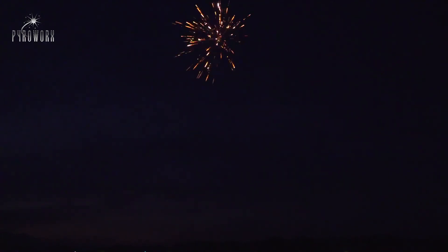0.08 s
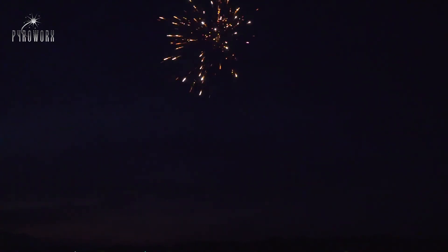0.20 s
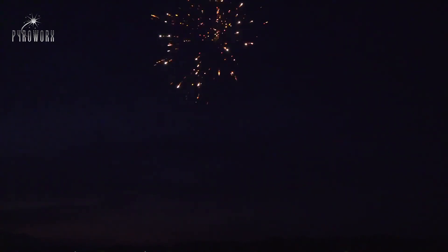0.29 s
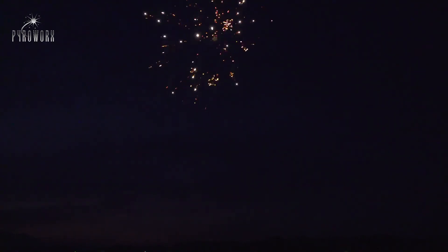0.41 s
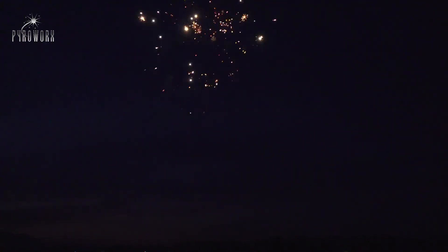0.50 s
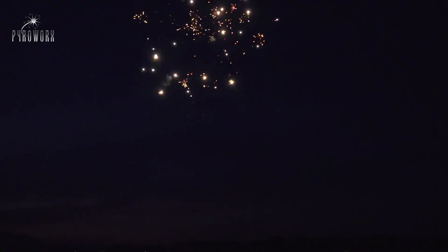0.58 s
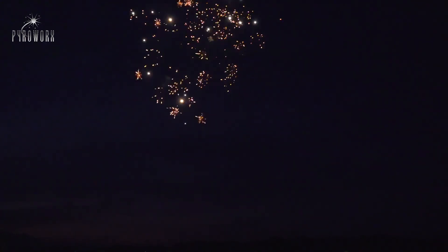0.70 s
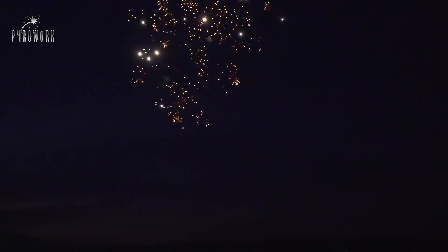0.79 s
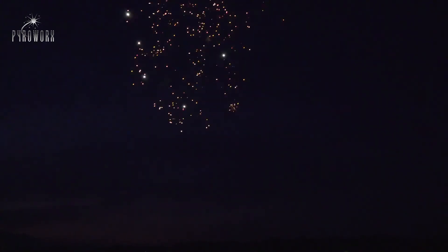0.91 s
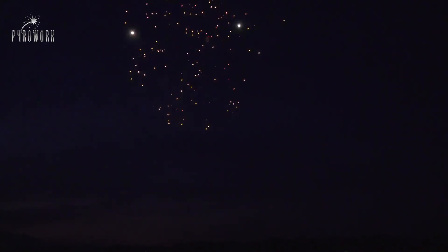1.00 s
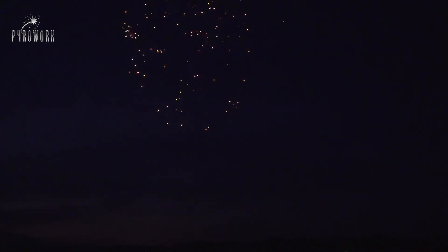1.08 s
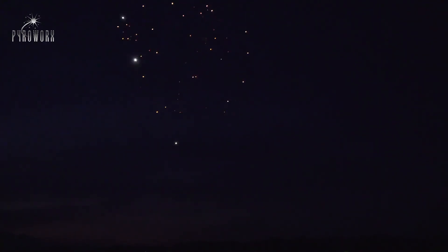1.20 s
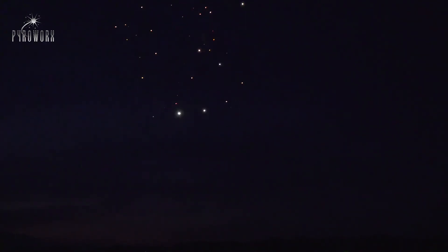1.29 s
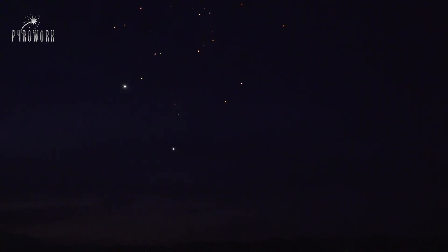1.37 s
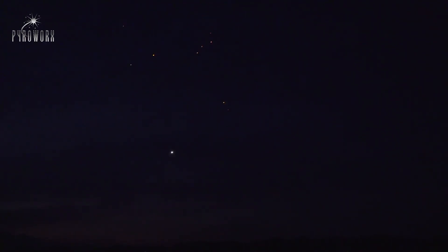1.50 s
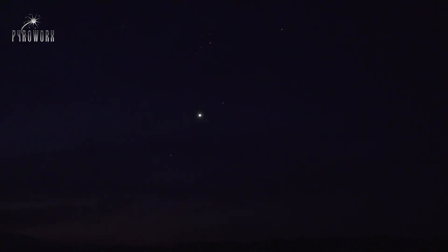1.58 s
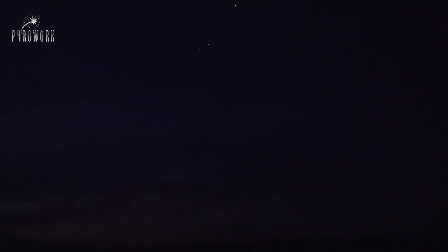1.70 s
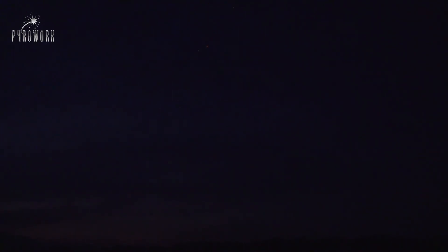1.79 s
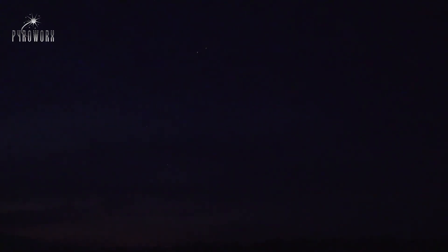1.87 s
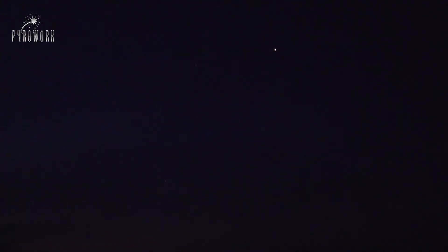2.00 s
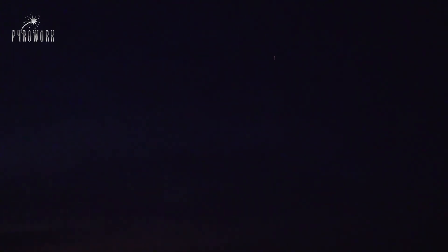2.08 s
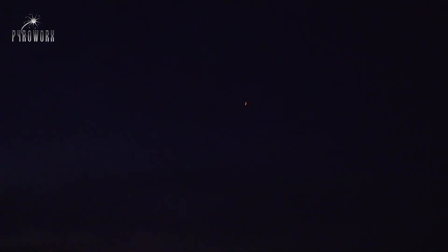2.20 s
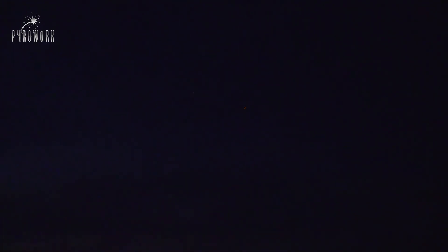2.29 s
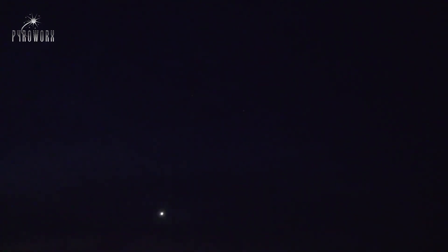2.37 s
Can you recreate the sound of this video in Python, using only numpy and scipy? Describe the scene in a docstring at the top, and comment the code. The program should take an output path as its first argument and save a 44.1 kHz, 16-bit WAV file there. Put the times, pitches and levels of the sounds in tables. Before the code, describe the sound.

A firework star bursts with one loud, hard bang after a quarter second, echoes dully, then its sparks crackle in a swelling flurry around one second and fade into open night air, picked up by a slightly overloaded microphone.

```python
"""Outdoors at night: distant hush (shaped noise), low wind rumble (narrow noise), a cricket (rung clicks).
A soft thud, then a firework star bursts high up: a squared-off swing, its ground bounce, scatter and hiss.
The far surroundings return it as coloured random taps and as single thuds, while the rumble comes and goes.
Its sparks then crackle as push-pull pulses with a long tail; late on the cricket chirps twice more.
The microphone input clips on the loudest peaks; the two sides are almost alike."""
import sys
import numpy as np
from scipy import signal
from scipy.io import wavfile
from scipy.ndimage import uniform_filter1d

SR = 44100
rng = np.random.default_rng(int(sys.argv[2]) if len(sys.argv) > 2 else 0)


def file_out(sig):
    """Save sig as 16-bit WAV at sys.argv[1]."""
    # one column per channel
    cols = np.atleast_2d(sig).T
    # limit, then scale
    lim = np.clip(cols, -1, 1)
    pcm = np.round(lim * 32767).astype(np.int16)
    wavfile.write(sys.argv[1], SR, pcm)


N = 105840  # length in samples

# Colour of the distant hush: (frequency [Hz], relative level [dB])
HUSH_COLOUR = [(30, -21), (70, -23), (167, -1.5), (374, 0), (774, -8), (2080, -12), (4800, -22.5),
               (5900, -27.5), (9000, -33.5), (14000, -44), (15200, -54)]
HUSH_DB = -56.5
# Low wind rumble, one list before the burst and one after: (time [s], level [dB])
WIND_LEVELS = [
    [(0.0, -90), (0.088, -48), (0.126, -48.5), (0.154, -57), (0.198, -47), (0.22, -75)],
    [(0.3, -67), (0.37, -49), (0.46, -74), (0.57, -54), (0.608, -69), (0.65, -51), (0.69, -62),
     (0.746, -51), (0.78, -67), (2.4, -78.5)],
]
# Middle of the rumble's band, one for each list: (frequency [Hz])
WIND_HZ = [62, 86]
# Cricket chirps: (start [s], length [s], level [dB])
CHIRPS = [(0.0, .14, -71), (1.885, .13, -76), (2.13, .15, -77)]
CHIRP_HZ, CHIRP_WIDTH_HZ, TEETH_PER_S = 7200, 290, 156

# Single dull thuds, peak before the bass cut: (time [s], peak [dB], pitch [Hz])
THUDS = [(0.1997, -38, 1270), (0.3292, -28, 317), (.3569, -33.5, 424), (0.3668, -26, 264),
         (0.5706, -33, 380), (0.617, -33, 1000), (0.6296, -35, 500), (0.662, -46, 360), (0.729, -38, 440),
         (0.75, -33, 360), (1.4824, -35, 915), (1.5055, -32.5, 553), (1.5247, -32, 365),
         (1.534, -33.5, 313), (1.55, -34, 332), (1.574, -37.5, 375), (1.788, -41, 320),
         (1.8703, -39.5, 340), (1.9438, -42, 312), (2.0264, -42.5, 414), (2.2255, -43, 285)]
THUD_TURNS = 0.78  # how many turns until a thud has faded to 1/e, either way from its middle

# The burst and its ground bounce, level before dulling:
# (time [s], level [dB re clipping], drive into squaring off [dB], top frequency [Hz])
BURST = [(.24552, 1.7, 19, 6600), (.25137, -2.7, 17, 2100)]
BLAST_HZ, BLAST_RAD = 534, 0.3  # pitch and phase at the start of the swing
BLAST_DIE_S, BLAST_SLOW_S = 0.002, 0.00254  # the swing slows as it dies
# Suction after the burst, then a slow swell back: (sign, level [dB], decay [s])
SUCTION = [(-1, -7.6, .0064), (-1, -9.84, .0396), (1, -13.72, .0683)]
FIZZ_DB, FIZZ_S, FIZZ_HZ = -16, 0.0047, 2380  # close scatter: level before dulling, decay, top
HISS_DB, HISS_S, HISS_HZ = -43, 1, 1500  # hanging hiss: level before filtering, decay, low edge
# The hiss swells once: (start [s], length [s], level [dB])
HISS_SWELL = (.478, 0.06, 5.8)

# Echoes of the burst from far surroundings, before puffs and bass cut: (time [s], level [dB])
ECHO_LEVELS = [(0.26, -50), (0.39, -47.5), (1.09, -44), (1.2, -51.5), (1.94, -52), (2.4, -61)]
# Stronger walls of echo added to that level: (start [s], length [s], level [dB])
WALLS = [(0.305, 0.092, -37.5), (0.36, 0.098, -49), (0.586, 0.12, -47.5), (0.707, 0.069, -56.5),
         (1.456, 0.073, -46.5), (1.516, 0.091, -48), (1.954, 0.22, -62)]
# Colour of the early echoes: (frequency [Hz], relative level [dB])
EARLY_COLOUR = [(40, -40), (90, 7), (180, -1.5), (330, -6.5), (450, -2), (620, -16), (1200, -14),
                (4500, -19.5), (15000, -41.5)]
# Colour of the late echoes: (frequency [Hz], relative level [dB])
LATE_COLOUR = [(60, -48), (120, -13.5), (350, -2), (520, -6), (720, -14), (1000, -7.5), (2000, -20),
               (5000, -30), (15000, -75)]
ECHOES_PER_S, ECHO_SPREAD_DB = 2600, 0.7
LUMPS_DB, LUMP_S = 1.8, 0.02  # echoes come in uneven puffs
FAR_S = 1.1  # delay after the burst by which the echoes have their late colour
LOW_CUT_HZ = 95  # far sound carries no deep bass

# Spark cracks, direct or off the ground, before scatter and bass cut: (time [s], peak [dB], width [ms])
CRACKS = [(0.4818, -33, 0.08), (0.4907, -27.5, 0.24), (0.5879, -25.5, 0.073), (0.6036, -22.2, 0.121),
          (0.6456, -23.8, 0.081), (0.6723, -26, 0.065), (0.6763, -28.7, 0.105), (0.6961, -18.7, 0.077),
          (0.7017, -21.8, 0.084), (0.7024, -27.9, 0.171), (0.7079, -27.4, 0.165), (0.7146, -16.1, 0.117),
          (0.7231, -27, 0.1), (0.7785, -17.8, 0.087), (0.7845, -24.7, 0.161), (0.8194, -16.1, 0.102),
          (0.8262, -23.5, 0.18), (0.8332, -14.4, 0.081), (0.8393, -23.9, 0.19), (0.8417, -19.6, 0.095),
          (0.8479, -26, 0.2), (0.8527, -23.4, 0.083), (0.8539, -12.2, 0.095), (0.8579, -12.0, 0.087),
          (0.8643, -25.1, 0.183), (0.8654, -12.5, 0.102), (0.8673, -13.9, 0.093), (0.8715, -21, 0.2),
          (0.8732, -22.8, 0.172), (0.887, -15.5, 0.092), (0.8933, -25.8, 0.208), (0.9025, -7.9, 0.1),
          (0.9161, -10.1, 0.093), (0.9179, -15.7, 0.089), (0.9244, -13.0, 0.119), (0.9282, -12.5, 0.102),
          (0.9297, -21.0, 0.154), (0.9309, -14.3, 0.134), (0.9325, -9.2, 0.092), (0.9347, -23.5, 0.201),
          (0.9358, -20.4, 0.137), (0.9391, -14.4, 0.092), (0.9403, -12.9, 0.106), (0.9464, -9.2, 0.105),
          (0.9514, -24.3, 0.295), (0.954, -11.5, 0.094), (0.956, -11.9, 0.117), (0.9608, -13.3, 0.087),
          (0.9618, -10.2, 0.126), (0.9625, -8.7, 0.12), (0.9668, -22.3, 0.177), (0.9688, -24.7, 0.3),
          (0.9694, -23.2, 0.194), (0.9882, -12.3, 0.108), (0.9905, -12.0, 0.114), (0.9915, -10.4, 0.088),
          (0.9923, -11.2, 0.098), (0.9938, -10.8, 0.11), (0.9946, -21.6, 0.3), (0.9969, -21.3, 0.25),
          (0.9984, -20.9, 0.3), (0.9997, -9.3, 0.104), (1.0061, -20.0, 0.172), (1.0069, -13.0, 0.113),
          (1.0139, -9.0, 0.11), (1.0159, -11.9, 0.133), (1.0193, -11.6, 0.1), (1.0202, -18.1, 0.158),
          (1.0216, -11.4, 0.106), (1.0251, -22.5, 0.175), (1.0269, -5.5, 0.109), (1.0279, -7.0, 0.107),
          (1.0324, -9.9, 0.126), (1.0337, -16.7, 0.3), (1.0382, -11.1, 0.1), (1.0391, -11.2, 0.104),
          (1.0424, -11.8, 0.1), (1.0435, -15.5, 0.157), (1.0441, -19.0, 0.179), (1.0454, -12.7, 0.111),
          (1.049, -22, 0.17), (1.0669, -9.4, 0.115), (1.0786, -7.7, 0.108), (1.0837, -14.8, 0.177),
          (1.085, -11.8, 0.119), (1.0901, -15.4, 0.098), (1.0913, -21.3, 0.247), (1.0965, -24.6, 0.189),
          (1.1002, -9.1, 0.101), (1.102, -11.7, 0.12), (1.1068, -25.3, 0.3), (1.1105, -9.3, 0.107),
          (1.1172, -17, 0.207), (1.1228, -10.4, 0.081), (1.1297, -21.4, 0.3), (1.1302, -13.4, 0.107),
          (1.1364, -10.8, 0.102), (1.1629, -9.5, 0.106), (1.1833, -12.0, 0.133), (1.1889, -26.3, 0.3),
          (1.1908, -7.5, 0.102), (1.1971, -17.4, 0.197), (1.2322, -12.0, 0.154), (1.2366, -18.4, 0.141),
          (1.3861, -3.2, 0.103), (1.3917, -28.2, 0.3), (1.4698, -30.0, 0.3)]
CRACK_SHAPE = 2.22  # exponent of the pulse
AIR_HZ = 9200  # the air takes the edge off each crack
FRONT_MS, FRONT_SHARE = 0.07, 0.5  # wide cracks keep a thin sharp front, up to this share
SCATTER_DB, SCATTER_S = -16.5, 0.0062  # close scatter: energy and decay
CRACK_TAIL_DB, CRACK_TAIL_START_S = -18.5, 0.014  # long tail: energy and fade-in
# Dying away of the crack tail: (frequency [Hz], time to fall 60 dB [s])
CRACK_TAIL_T60 = [(200, 4.5), (800, 13.4), (2500, 4), (6000, 1.64), (14000, 0.39)]
# Starting colour of the crack tail: (frequency [Hz], relative level [dB])
CRACK_TAIL_COLOUR = [(100, 15.5), (400, 5), (1500, -7.5), (5000, 4.5), (14000, 8)]

# Difference between the two sides: (frequency [Hz], side minus mid [dB])
SIDE_COLOUR = [(60, -22), (200, -36), (700, -45), (2380, -66), (8120, -62), (15000, -17)]
RIGHT_DB = 0.08  # the right side is a touch louder
EDGE_HZ = 16000  # upper band limit


def gain_of(db):
    """Turns a level in dB into an amplitude factor."""
    return 10 ** (np.asarray(db) / 20)


def evened(x):
    """Scales x to an RMS of one."""
    return x / np.sqrt(np.mean(x ** 2) + 1e-20)


def read(points, hz):
    """Reads a frequency table between its points, on a log frequency scale."""
    f, value = np.transpose(points)
    return np.interp(np.log(hz + 1), np.log(f + 1), value)


def add(mix, s, sound):
    """Adds a sound into the mix from s seconds on, cut at the end of the mix."""
    part = mix[round(s * SR):][:len(sound)]
    part += sound[:len(part)]


def shape(x, db_at):
    """Colours x by a gain in dB over frequency and time."""
    hz, t, z = signal.stft(x, SR, nperseg=512, noverlap=384)
    coloured = z * gain_of(db_at(hz[:, None], t))
    return signal.istft(coloured, SR, nperseg=512, noverlap=384)[1][:len(x)]


def thin(x):
    """Takes out the deep bass."""
    return signal.sosfilt(signal.butter(3, LOW_CUT_HZ, "high", fs=SR, output="sos"), x)


def dulled(x, hz):
    """Rolls the treble off gently above hz, with a one-pole low-pass."""
    r = np.exp(-2 * np.pi * hz / SR)
    return signal.lfilter([1 - r], [1, -r], x)


def arrivals(per_s, spread_db):
    """Sparse taps of random sign and size, like reflections from many scattered things."""
    chance, side, luck = rng.random((3, N))
    sign = (chance < per_s / SR) * np.sign(side - 0.5)
    size = (1 - luck * 0.98) ** (-spread_db * np.log(10) / 20)
    return evened(sign * size)


def hush():
    """Distant night hush: steady noise, coloured by frequency."""
    noise = rng.standard_normal(N)
    return gain_of(HUSH_DB) * evened(shape(noise, lambda hz, t: read(HUSH_COLOUR, hz)))


def wind():
    """Lumpy low rumble of wind: narrow bands of noise that rise and fall in gusts."""
    out, t = np.zeros(N), np.arange(N) / SR
    for gusts, hz in zip(WIND_LEVELS, WIND_HZ):
        band = signal.butter(3, [hz * 0.7, hz * 1.4], "band", fs=SR, output="sos")
        level = gain_of(np.interp(t, *np.transpose(gusts), left=-99, right=-99))
        out += level * evened(signal.sosfilt(band, rng.standard_normal(N)))
    return out


def cricket():
    """Wing teeth click fast into one high resonance, stronger towards the end of each chirp."""
    out, t = np.zeros(N), np.arange(300) / SR
    ring = t * np.exp(-2 * np.pi * CHIRP_WIDTH_HZ * t) * np.sin(2 * np.pi * CHIRP_HZ * t)
    for s, length, db in CHIRPS:
        teeth = np.arange(round(length * SR)) * TEETH_PER_S / SR
        unevenness = gain_of(1.5 * rng.standard_normal(len(teeth)))
        clicks = np.diff(np.floor(teeth), prepend=0) * unevenness
        swell = 0.5 + 0.5 * teeth / teeth[-1]
        add(out, s, gain_of(db) * evened(np.convolve(clicks * swell, ring)))
    return out


def thuds():
    """Single dull returns of a bang, each a short push, pull, push; far off, so without deep bass."""
    out, t = np.zeros(N), np.arange(-400, 400) / SR
    for s, db, hz in THUDS:
        fade = np.exp(-(hz * t / THUD_TURNS) ** 2)
        add(out, s + t[0], -gain_of(db) * np.cos(2 * np.pi * hz * t) * fade)
    return thin(out)


def burst():
    """A jump in pressure that swings and dies, its duller bounce, scatter, hiss and a slow suction."""
    out, t = np.zeros(N), np.arange(SR) / SR
    burst_s, bounce_s = BURST[0][0], BURST[1][0]

    turned = 2 * np.pi * BLAST_HZ * BLAST_SLOW_S * (1 - np.exp(-t / BLAST_SLOW_S))
    swing = np.exp(-(t / BLAST_DIE_S) ** 2.26) * np.cos(turned + BLAST_RAD)
    for s, db, drive_db, top_hz in BURST:
        squared_off = np.tanh(gain_of(drive_db) * swing)
        add(out, s, gain_of(db) * dulled(squared_off, top_hz))

    suction = sum(sign * gain_of(db) * np.exp(-t / decay_s) for sign, db, decay_s in SUCTION)
    suction = suction * np.minimum(t / BLAST_DIE_S, 1)

    near, far = rng.standard_normal((2, SR))
    fizz = gain_of(FIZZ_DB) * dulled(near, FIZZ_HZ) * np.exp(-t / FIZZ_S)

    # the bright part of the blast hangs in the air
    hiss = far - dulled(far, HISS_HZ)
    for _ in range(3):
        hiss = dulled(hiss, 6500)
    hiss = gain_of(HISS_DB) * hiss * np.exp(-t / HISS_S) * (1 - t)
    start, length, db = HISS_SWELL
    across = (t + burst_s - start) / length * 2 - 1  # -1 to 1 over the swell
    hiss = hiss * gain_of(db * np.exp(-across ** 4))

    add(out, burst_s, fizz / 3 + suction + hiss)
    add(out, bounce_s, fizz)
    return out


def echoes():
    """The burst returns from far things as a spray of taps, duller the later it comes."""
    t = np.arange(N) / SR
    opening = np.clip((t - BURST[1][0]) / 0.006, 0, 1)  # silent until the ground bounce
    level = gain_of(np.interp(t, *np.transpose(ECHO_LEVELS))) * opening
    for s, length, db in WALLS:
        add(level, s, gain_of(db) * np.hanning(round(length * SR)) ** 0.5)

    def colour(hz, t):
        late = np.clip((t - BURST[0][0]) / FAR_S, 0, 1)
        return (1 - late) * read(EARLY_COLOUR, hz) + late * read(LATE_COLOUR, hz)

    lumps = evened(uniform_filter1d(rng.standard_normal(N), round(LUMP_S * SR)))
    taps = arrivals(ECHOES_PER_S, ECHO_SPREAD_DB) * gain_of(LUMPS_DB * lumps)
    return thin(shape(level * taps, colour)) / np.std(shape(taps, colour))


def pulse(width_ms):
    """One crack: a quick push and a longer pull, softened by the air, its peak at sample 100."""
    k = CRACK_SHAPE
    u = np.arange(300) / SR * 1000 / width_ms * (0.74 * k)
    push_pull = (k - u) * u ** (k - 1) * np.exp(-u)
    soft = signal.lfilter(*signal.butter(2, AIR_HZ, fs=SR), push_pull)
    return np.roll(soft, 100 - soft.argmax()) / soft.max()


def crackle():
    """Sparks crack as pressure pulses; close scatter and a long tail follow each one."""
    cracks = np.zeros(N)
    for s, db, width_ms in CRACKS:
        front = FRONT_SHARE * np.clip(1 - 2 * FRONT_MS / width_ms, 0, 1)
        crack = (1 - front) * pulse(width_ms) + front * pulse(FRONT_MS)
        add(cracks, s - 100 / SR, gain_of(db) * crack)  # puts the peak at s

    t = np.arange(N) / SR
    t_near = t[:1500]
    scatter = arrivals(11000, 0.93)[:1500] * np.exp(-t_near / SCATTER_S) * (t_near > 0.0004)
    tail = shape(rng.standard_normal(N) * np.minimum(t / CRACK_TAIL_START_S, 1),
                 lambda hz, t: read(CRACK_TAIL_COLOUR, hz) - 60 * t / read(CRACK_TAIL_T60, hz))
    space = gain_of(CRACK_TAIL_DB) * tail / np.linalg.norm(tail)
    add(space, 0, gain_of(SCATTER_DB) * scatter / np.linalg.norm(scatter))
    return thin(cracks + signal.fftconvolve(cracks, space)[:N])


def scene():
    """Nearly mono: the two sides differ by a faint smeared copy."""
    mid = burst() + crackle() + echoes() + thuds() + hush() + wind() + cricket()
    smear = rng.standard_normal(400)
    side = signal.fftconvolve(np.clip(mid, -1, 1), smear / np.linalg.norm(smear))[:N]
    side = shape(side, lambda hz, t: read(SIDE_COLOUR, hz))
    return np.array([mid + side, (mid - side) * gain_of(RIGHT_DB)])


def record(dry):
    """The microphone input clips at full scale; then comes the band limit, clipped once more."""
    band_limit = signal.firwin(255, EDGE_HZ, window=("kaiser", 9), fs=SR)[None]
    overloaded = np.clip(dry, -1, 1)
    return np.clip(signal.oaconvolve(overloaded, band_limit, "same"), -1, 1)


dry = scene()
out = record(dry)
file_out(out)
```